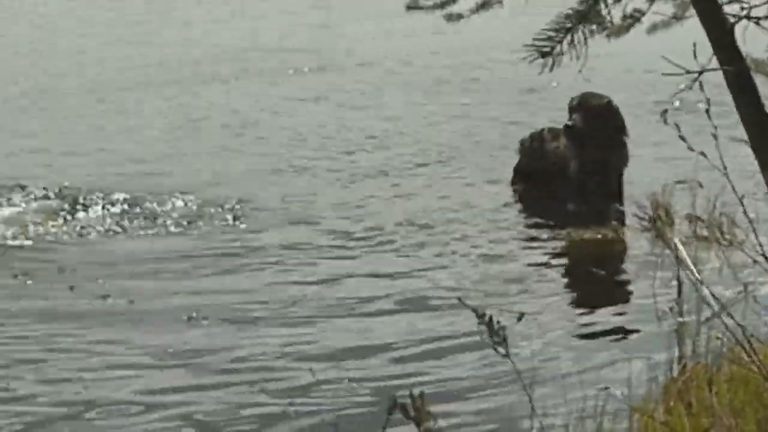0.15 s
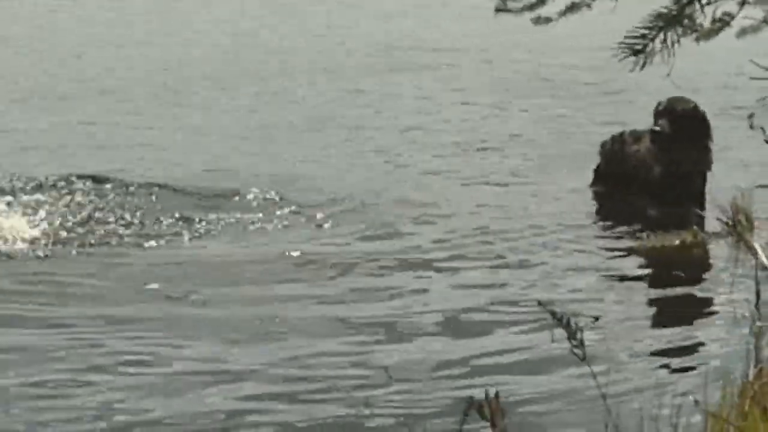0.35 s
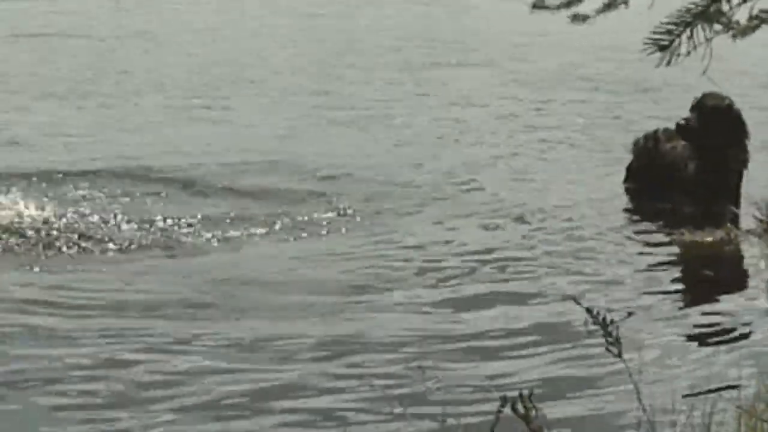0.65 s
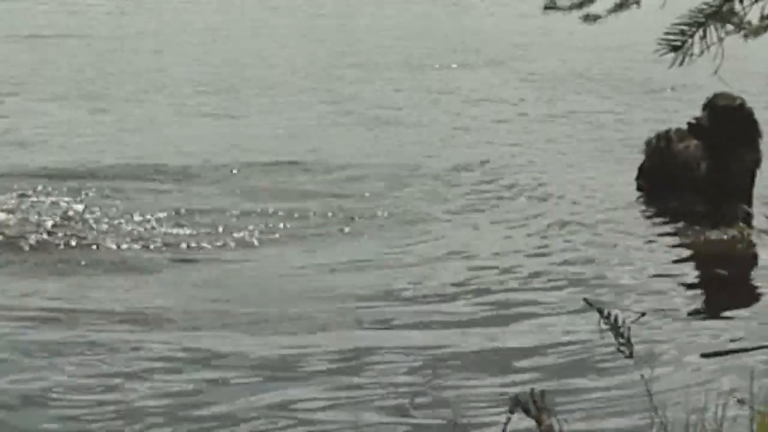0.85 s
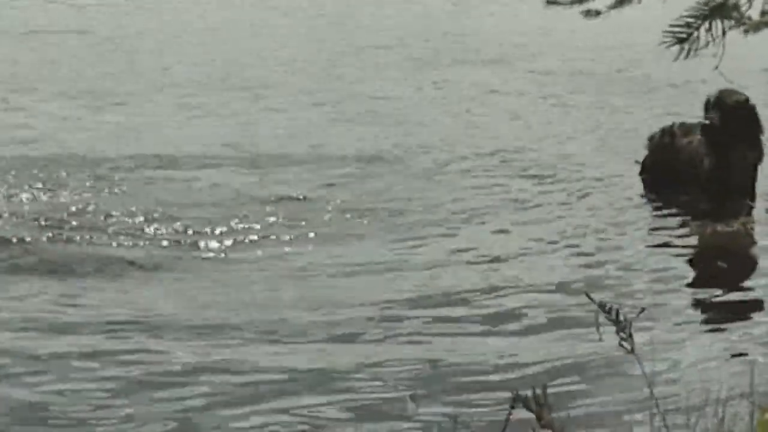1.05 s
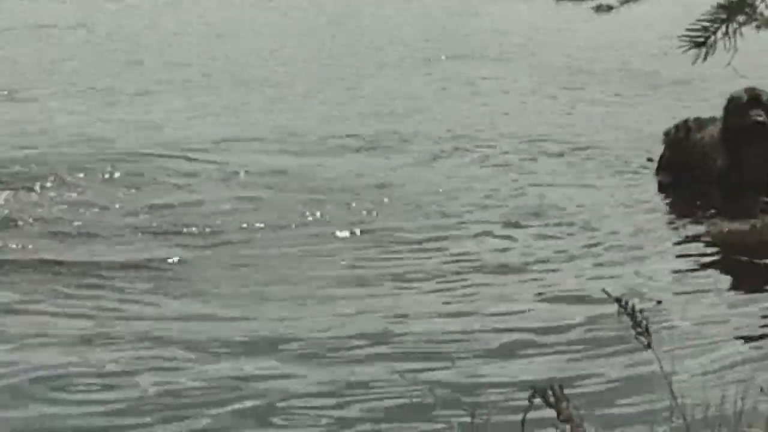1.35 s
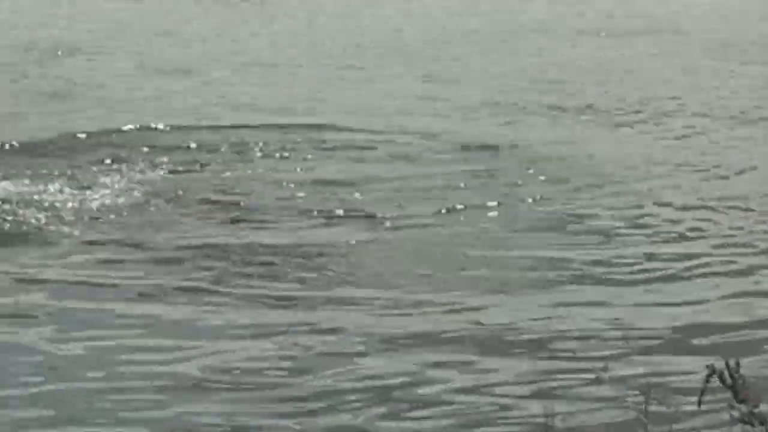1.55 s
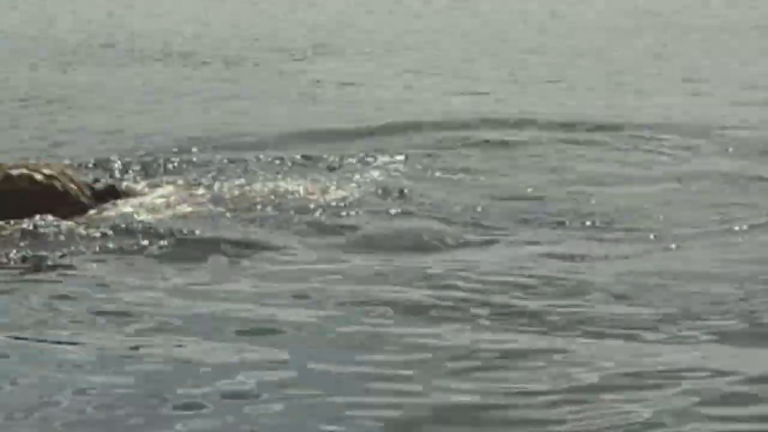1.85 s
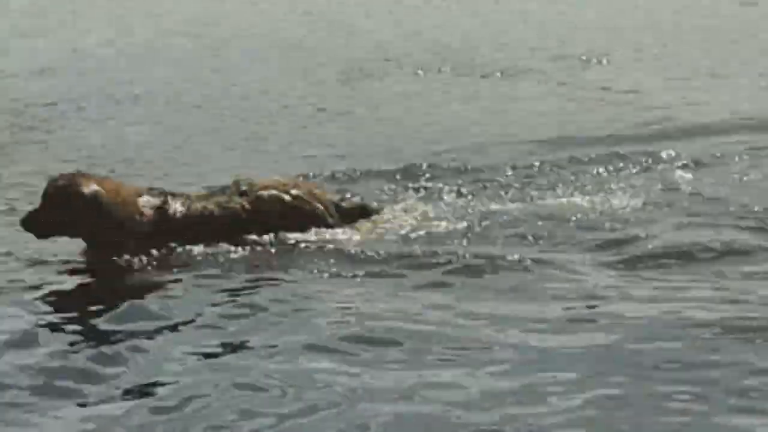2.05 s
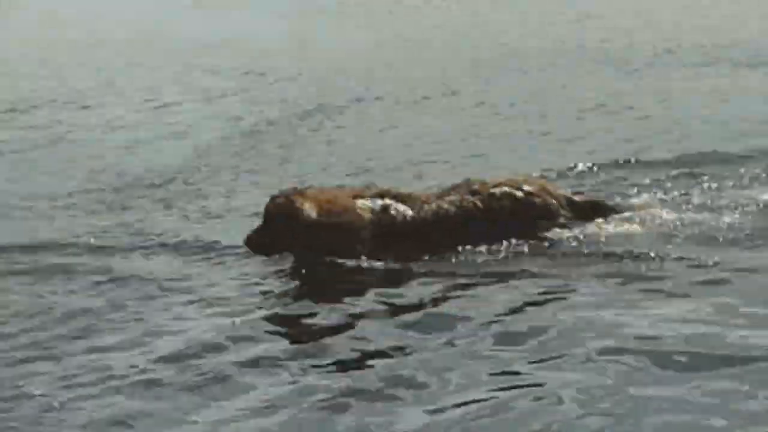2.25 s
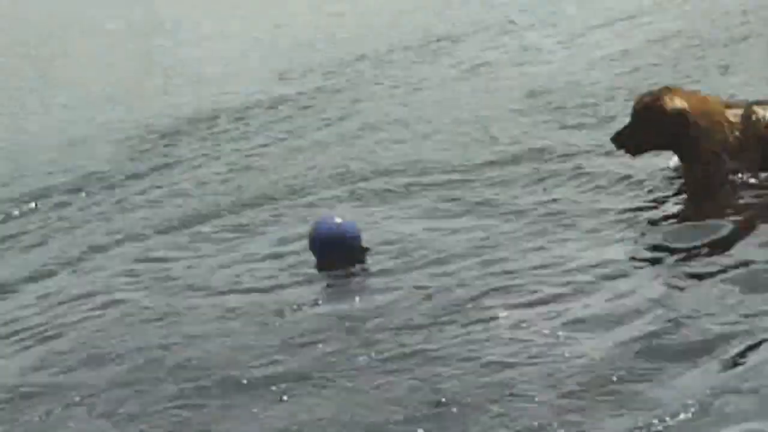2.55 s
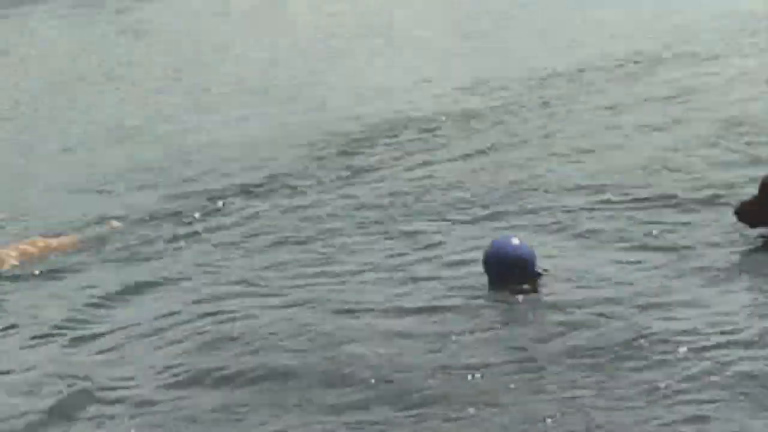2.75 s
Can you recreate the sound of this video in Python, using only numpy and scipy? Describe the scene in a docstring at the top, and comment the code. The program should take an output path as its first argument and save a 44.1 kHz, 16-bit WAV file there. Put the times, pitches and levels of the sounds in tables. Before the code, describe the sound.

Water splashing in a lake as dogs wade and swim. From 0 to 1.3 s, bubbly churning, low gurgles, light slaps and small breaking waves, with spray and clear drips near 1 s. At about 1.35-1.4 s, hard slaps start a plunge, with deep gulps and plops around 1.55-1.65 s and foaming wash until 2 s. Then quiet ripples, a few soft plops and faint outdoor air until 2.9 s.

```python
"""Dogs splashing in a lake

Dogs wade and lunge through the shallows; one plunges in with deep gulps of air, then the water calms
to lapping ripples, drips and outdoor air. Bubbles are clouds of damped rings, foam and thuds are coloured
noise, and plops, slaps and plinks are single short rings. Trees on the bank return a faint scatter."""
import sys
import numpy as np
from scipy import signal
from scipy.fft import rfft, irfft
from scipy.io import wavfile
from scipy.ndimage import uniform_filter1d

SR = 44100
rng = np.random.default_rng(int(sys.argv[2]) if len(sys.argv) > 2 else 0)


def wav_out(sig):
    """Save sig, one row per channel (or a flat mono array), as 16-bit PCM at SR to the path in sys.argv[1]."""
    wavfile.write(sys.argv[1], SR, np.round(np.clip(np.atleast_2d(sig).T, -1, 1) * 32767).astype(np.int16))


N = 127890
T = np.arange(N) / SR  # seconds

# Every *_COLOUR table is a relative spectrum: frequency_hz, density_db (dB per Hz)
# Outdoor air and lapping ripples
AIR_COLOUR = [(20, 1), (60, 1.5), (170, -4), (300, -6), (800, -5), (1500, -8.5), (1900, -12.5),
              (3000, -15.5), (5000, -20.5), (7000, -33)]
# Fine drips off the wet coats: time_s, level_db
DRIP_LEVEL = [(0, -61), (1.0, -57), (1.45, -55.5), (2.05, -61.5), (2.3, -72), (2.9, -71)]
# Thrown spray that lands: peak_s, rise_s, fade_s, level_db
SPRAY_SHOWERS = [(0.595, 0.024, 0.028, -45.5), (0.825, 0.017, 0.018, -44.5), (0.971, 0.032, 0.033, -55.5),
                 (1.026, 0.0045, .006, -44.5), (1.188, .004, 0.017, -49.5), (1.254, .003, .004, -49),
                 (1.272, 0.0013, 0.004, -37), (1.336, 0.004, 0.0073, -36), (1.349, 0.0032, 0.0046, -36.5),
                 (1.39, 0.0062, .012, -39.5), (1.474, 0.046, .015, -43), (1.637, 0.022, 0.024, -46),
                 (1.725, 0.042, 0.021, -49), (1.856, 0.0039, 0.0037, -51.5), (2.09, 0.16, 0.32, -54.5),
                 (2.749, 0.0017, .004, -47.5)]
# Spray: frequency_hz, density_db
SPRAY_COLOUR = [(300, -19.5), (1500, -8.5), (2800, 4.5), (4200, -5), (5300, -6.5), (7000, -18)]
# Clear drops that ring as they land: start_s, pitch_hz, level_db
PLINK_DROPS = [(0.945, 3360, -41), (1.012, 5640, -47.5), (1.04, 3440, -38), (1.463, 6180, -46),
               (1.882, 4360, -48), (2.048, 4400, -47.5)]
# Big bubbles gurgling round the legs: time_s, level_db
GURGLE_LEVEL = [(0, -43.5), (0.12, -38.5), (0.22, -56), (0.4, -40.5), (0.52, -43.5), (0.75, -40),
                (0.85, -41), (1.0, -44), (1.13, -41.5), (1.23, -65), (1.35, -47), (1.7, -36.5),
                (1.9, -40.5), (2.1, -52.5), (2.3, -61), (2.9, -58)]
# Gurgle: frequency_hz, density_db
GURGLE_COLOUR = [(60, -15.5), (150, -9.5), (250, 3), (350, -4), (520, -9), (900, -32), (3000, -50.5)]
# Water churned by wading: time_s, level_db (before CHURN_TRIM_DB)
CHURN_LEVEL = [(0.0, -43.5), (0.234, -38), (0.39, -40), (0.448, -36.5), (1.226, -41), (1.252, -39.5),
               (1.3, -41)]
# Churned water: frequency_hz, density_db
CHURN_COLOUR = [(40, -36), (100, -8.5), (170, -7), (260, -3.5), (530, -1), (720, -3.5), (990, 0),
                (1260, -11.5), (1540, -3), (1900, -20), (2250, -13), (2900, -12.5), (4000, -24),
                (5100, -32), (7000, -45.5)]
# Small waves that break in the churn: peak_s, rise_s, fade_s, level_db
BREAKING_WAVES = [(0.3, .008, 0.022, -41.5), (0.49, 0.03, 0.041, -33.5), (0.7, .015, 0.02, -34.5),
                  (0.901, 0.023, 0.021, -37), (2.108, 0.11, 0.064, -45.5), (2.864, 0.041, 0.019, -44.5)]
# Sharp slaps on the surface: start_s, pitch_hz, peak_db
SURFACE_SLAPS = [(0.116, 586, -29), (0.294, 994, -31.5), (0.417, 1000, -29), (0.516, 986, -30),
                 (0.611, 975, -28.5), (0.899, 920, -31), (1.011, 872, -26), (1.256, 986, -30),
                 (1.315, 899, -30), (1.348, 930, -21), (1.384, 736, -19), (1.534, 557, -21.5),
                 (1.553, 857, -29.5), (1.636, 799, -28), (1.81, 890, -33.5), (1.894, 890, -31),
                 (2.091, 916, -35), (2.093, 1434, -36), (2.748, 814, -38), (2.866, 890, -45),
                 (2.886, 1300, -41)]
# Strokes that push a body of water: peak_s, rise_s, fade_s, level_db, thud_db (relative to the gulps)
WATER_STROKES = [(0.12, 0.029, 0.0062, -42.5, -18), (0.484, 0.07, 0.024, -37, -18),
                 (0.574, 0.014, 0.023, -46, 4), (0.647, 0.015, 0.018, -47, 5.5),
                 (0.835, 0.036, 0.04, -39.5, 0), (1.397, 0.013, 0.0073, -23.5, -10.5),
                 (1.482, 0.016, 0.022, -34, -3), (1.569, 0.017, 0.021, -28.5, -1),
                 (1.603, 0.023, 0.016, -27, -9.5), (1.636, 0.011, 0.013, -27.5, -4),
                 (2.219, 0.014, 0.038, -52.5, 6)]
# Gulps in the strokes: frequency_hz, density_db
STROKE_COLOUR = [(40, -35), (150, -22.5), (260, 0.5), (390, 9), (590, -4.5), (820, -3), (1250, -13),
                 (1800, -24), (7000, -56.5)]
# Dull thud under the strokes: frequency_hz, density_db
THUD_COLOUR = [(20, -16.5), (55, -7.5), (110, 3), (165, 0), (230, -3), (400, -21), (2000, -70)]
# Large air pockets that close and ring: start_s, pitch_hz (mid-ring), peak_db, length_s
AIR_POCKETS = [(0.375, 335, -33, 0.028), (0.448, 515, -27, 0.012), (0.474, 393, -32, 0.011),
               (0.492, 247, -31.5, 0.041), (0.552, 260, -30, 0.0094), (0.639, 157, -28, 0.013),
               (0.685, 283, -31, 0.018), (0.799, 300, -32, 0.022), (0.839, 354, -29, 0.016),
               (1.159, 311, -20.5, 0.025), (1.397, 284, -25, 0.018), (1.428, 354, -30.5, 0.029),
               (1.466, 397, -29.5, 0.037), (1.548, 274, -26.5, 0.027), (1.564, 425, -20, 0.036),
               (1.58, 158.3, -24.5, 0.038), (1.592, 354, -19.5, 0.03), (1.614, 223, -28, 0.051),
               (1.621, 304, -20.5, 0.023), (1.685, 255, -22.5, 0.018), (1.711, 344, -25.5, 0.022),
               (1.77, 357, -27, 0.013), (1.837, 373.6, -31.5, 0.038), (1.896, 347, -32.5, 0.031),
               (2.147, 319, -40, 0.034), (2.459, 306, -38.5, 0.038)]
# Foaming wake of the plunge: frequency_hz, density_db
WAKE_COLOUR = [(40, -13.5), (150, -5.5), (260, -5.5), (390, 3), (590, -9.5), (820, -3), (1150, -10.5),
               (1500, -18), (1950, -25), (2700, -17), (3600, -31.5), (5000, -28.5), (7000, -48)]

AIR_DB = -47
BANK_DB, BANK_T60_S, BANK_LOW_HZ = -10.5, 0.3, 497
DRIP_LO_HZ, DRIP_HI_HZ, DRIPS_PER_S, DROPS_PER_S = 2278, 4796, 320, 4200
PLINK_RISE_S, PLINK_WIDTH_HZ, PLINK_SCATTER_S = 0.002, 390, 0.02
GURGLES_PER_S, GURGLE_CYCLES = 420, 1.94
CHURN_BUBBLES_DB, CHURN_FOAM_DB, CHURN_TRIM_DB = -5.5, -13, 1.22
CHURN_FADE_DB_PER_S = 21  # it settles once the wading stops
SLAP_RISE_S, SLAP_SPLAT_DB = 0.0019, -14
GULPS_PER_S = 990
PLOP_GLIDE, PLOP_SKEW = 0.1, 0.66  # pitch rise as a share of the pitch; skew under 1 peaks early
WAKE_START_S, WAKE_END_S, WAKE_RISE_S, WAKE_FADE_S = 1.364, 1.948, 0.0053, 0.16
WAKE_DB, WAKE_SAG_DB_PER_S = -32.3, 9.5  # level at the start, then a slow sag
# Cycles are counted per decay time (to 1/e); the glide is the share of pitch gained in that time
BUBBLES_PER_S, BUBBLE_CYCLES, BUBBLE_GLIDE = 3500, 2.54, 0.032
SIZE_SPREAD_DB = 1  # mean boost of a bubble, capped at three times this
CLUMP_DB = 1.2  # depth of the clumps in which bubbles form
EDGE_HZ = 7150


def amp(db):
    """Decibels to gain."""
    return 10 ** (np.asarray(db) / 20)


def unit(x):
    """Scales to rms 1."""
    return x / np.sqrt(np.mean(x ** 2) + 1e-20)


def level(points):
    """Gain over time from (time_s, level_db) points."""
    return amp(np.interp(T, *np.transpose(points)))


def add(mix, s, sound):
    """Mixes a sound in at a time in seconds."""
    part = mix[max(round(s * SR), 0):][:len(sound)]
    part += sound[:len(part)]


def colour(x, points):
    """Filters a sound by (frequency_hz, density_db) points, then sets rms 1."""
    hz, db = np.transpose(points)
    f = np.fft.rfftfreq(N, 1 / SR)
    gain = amp(np.interp(np.log(f + 1), np.log(hz + 1), db))
    return unit(irfft(rfft(x) * gain, N))


def swell(peak, rise, fade):
    """Exponential rise to a peak and fall from it."""
    return np.exp(-np.maximum((peak - T) / rise, (T - peak) / fade))


def swells(events):
    """Sums the gains of (peak_s, rise_s, fade_s, level_db) events."""
    return sum(amp(db) * swell(s, rise, fade) for s, rise, fade, db in events)


def pluck(t, rise):
    """Envelope that reaches 1 at the rise time and then dies away."""
    return t / rise * np.exp(1 - t / rise)


def bubbles(lo_hz, hi_hz, per_s, cycles, count=48):
    """Damped rings that rise in pitch; small ones are more frequent, and the power per Hz is even."""
    pitches = np.geomspace(lo_hz, hi_hz, count)
    shares = np.sqrt(pitches) / np.sqrt(pitches).sum()
    out = np.zeros(N)
    for hz, share in zip(pitches, shares):
        age = np.arange(0, 6 * cycles, hz / SR) / cycles  # in decay times
        ring = np.exp(-age) * np.sin(2 * np.pi * cycles * age * (1 + BUBBLE_GLIDE * age / 2))
        sign = np.sign(rng.random(N) - 0.5)
        size = sign * amp(SIZE_SPREAD_DB * np.minimum(rng.exponential(1, N), 3))
        births = size * (rng.random(N) < per_s * share / SR)
        out += np.sqrt(hz) * unit(signal.oaconvolve(births, ring)[:N])
    return unit(out)


def clumped(x):
    """Random patches of level, some 40 ms long and 400 Hz wide."""
    z = signal.stft(x, nperseg=512)[2]
    patches = rng.standard_normal(z.shape)
    for _ in range(2):
        patches = uniform_filter1d(patches, size=4, axis=0)  # across frequency
        patches = uniform_filter1d(patches, size=7, axis=1)  # across time
    return signal.istft(z * amp(CLUMP_DB * unit(patches)), nperseg=512)[1][:N]


def lake():
    """Steady outdoor air as noise, with lapping ripples as a bubble cloud."""
    ripples = 0.5 * bubbles(311, 4550, 540, cycles=2.1, count=24)
    return amp(AIR_DB) * colour(rng.standard_normal(N) + ripples, AIR_COLOUR)


def bank(x):
    """Faint scatter from the trees on the bank: sparse decaying echoes with little bass."""
    t = np.arange(SR // 2) / SR
    echoes = rng.standard_normal(len(t)) * (rng.random(len(t)) < 0.05)
    tail = echoes * amp(-60 * t / BANK_T60_S) * (t > 0.008)  # nothing returns in the first 8 ms
    thin = signal.sosfilt(signal.butter(2, BANK_LOW_HZ, "high", fs=SR, output="sos"), x)
    return amp(BANK_DB) * signal.oaconvolve(thin, tail / np.linalg.norm(tail))[:N]


def drips():
    """Sparse clear drips, each a long-ringing little bubble."""
    return level(DRIP_LEVEL) * bubbles(DRIP_LO_HZ, DRIP_HI_HZ, DRIPS_PER_S, cycles=21, count=24)


def spray():
    """Showers of tiny drops, a dense cloud of small rings swelling as each shower lands."""
    drops = colour(bubbles(650, 6800, DROPS_PER_S, cycles=2.2, count=20), SPRAY_COLOUR)
    return drops * swells(SPRAY_SHOWERS)


def plinks():
    """Each drop traps six tiny bubbles of similar size, born at scattered moments."""
    out, t = np.zeros(N), np.arange(SR // 20) / SR
    shape = pluck(t, PLINK_RISE_S)
    for s, hz, db in PLINK_DROPS:
        for spread, delay in rng.random(size=(6, 2)):
            ring = np.sin(2 * np.pi * (hz + PLINK_WIDTH_HZ * (spread - 0.5)) * t)
            add(out, s + PLINK_SCATTER_S * delay, amp(db) * shape * ring / 2)
    return out


def gurgle():
    """Fewer, larger bubbles under the churn, which ring lower."""
    cloud = bubbles(171.1, 587, GURGLES_PER_S, GURGLE_CYCLES, count=20)
    return level(GURGLE_LEVEL) * colour(cloud, GURGLE_COLOUR)


def churn():
    """Legs stir up bubbles and hissing foam, which surge as small waves break."""
    cloud = amp(CHURN_BUBBLES_DB) * bubbles(193.2, 6440, BUBBLES_PER_S, BUBBLE_CYCLES)
    foam = amp(CHURN_FOAM_DB) * rng.standard_normal(N)
    settled_s = np.maximum(T - CHURN_LEVEL[-1][0], 0)  # time since the wading stopped
    wading = level(CHURN_LEVEL) * amp(CHURN_TRIM_DB - CHURN_FADE_DB_PER_S * settled_s)
    surge = np.hypot(wading, swells(BREAKING_WAVES))
    return surge * colour(clumped(cloud + foam), CHURN_COLOUR)


def slaps():
    """A paw or a lump of water hits: a short ring with a splat of noise."""
    out, t = np.zeros(N), np.arange(SR // 20) / SR
    splat = colour(rng.standard_normal(N), [(100, -13.5), (900, 13), (3000, -9.5), (7000, -33.5)])
    shape = pluck(t, SLAP_RISE_S)
    for k, (s, hz, db) in enumerate(SURFACE_SLAPS):
        ring = np.sin(2 * np.pi * hz * t)
        noise = splat[k * len(t):][:len(t)]  # a fresh piece for each slap
        add(out, s, amp(db) * shape * (ring + amp(SLAP_SPLAT_DB) * noise))
    return out


def strokes():
    """Each shove folds big bubbles into the water over a dull thud."""
    cloud = bubbles(190.8, 2033, GULPS_PER_S, cycles=0.78, count=28)
    gulps = colour(cloud + 1.2 * rng.standard_normal(N), STROKE_COLOUR)
    thud = colour(rng.standard_normal(N), THUD_COLOUR)
    out = np.zeros(N)
    for s, rise, fade, db, thud_db in WATER_STROKES:
        out += swell(s, rise, fade) * amp(db) * (gulps + amp(thud_db) * thud)
    return out


def plops():
    """Single air pockets ring for a few cycles, rising slightly."""
    out = np.zeros(N)
    for s, hz, db, length in AIR_POCKETS:
        u = np.arange(0, length, 1 / SR) / length  # 0 to 1 over the ring
        turns = np.cumsum(hz * (1 + PLOP_GLIDE * (u - 0.5))) / SR
        shape = np.sin(np.pi * u ** PLOP_SKEW)
        add(out, s, amp(db) * shape * np.sin(2 * np.pi * turns))
    return out


def wake():
    """Foam boils up behind the plunging dog, sags slowly, and dies away as it starts to swim."""
    sag = amp(WAKE_DB - WAKE_SAG_DB_PER_S * np.maximum(T - WAKE_START_S, 0))
    rise = np.exp(np.minimum(T - WAKE_START_S, 0) / WAKE_RISE_S)
    fade = np.exp(-np.maximum(T - WAKE_END_S, 0) / WAKE_FADE_S)
    cloud = bubbles(223.4, 6470, BUBBLES_PER_S, BUBBLE_CYCLES, count=36)
    foam = 0.86 * rng.standard_normal(N)
    return sag * rise * fade * colour(clumped(cloud + foam), WAKE_COLOUR)


def scene():
    """All the water, its faint echo and the air, in mono."""
    water = drips() + spray() + plinks() + gurgle() + churn() + slaps() + strokes() + plops() + wake()
    return (lake() + bank(water) + water)[None]


def record(dry):
    """Band limit: a steep low-pass takes off the top treble."""
    lowpass = signal.firwin(511, EDGE_HZ, window=("kaiser", 9), fs=SR)
    return signal.oaconvolve(dry, lowpass[None], "same")


dry = scene()
out = record(dry)
wav_out(out)
```